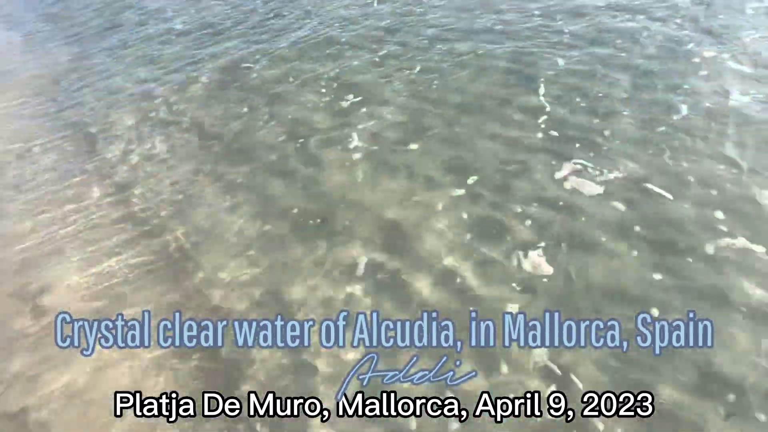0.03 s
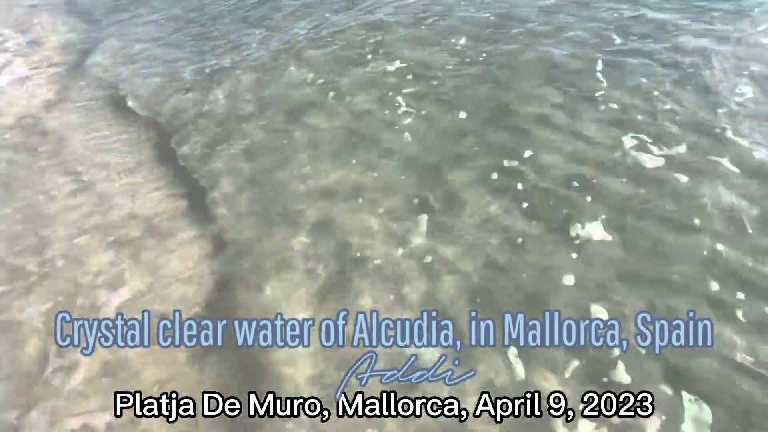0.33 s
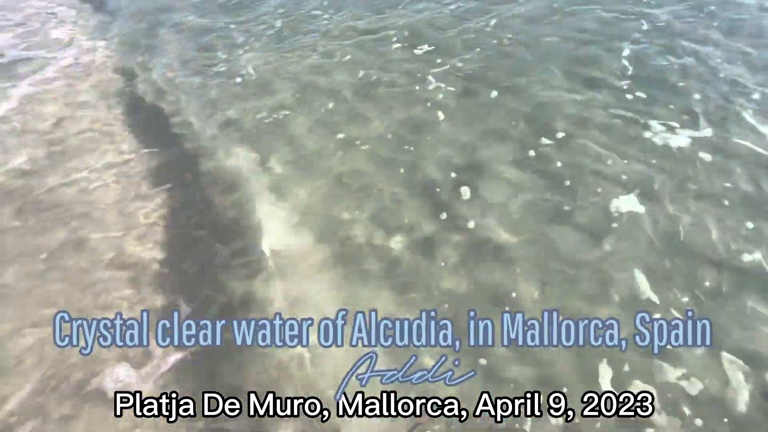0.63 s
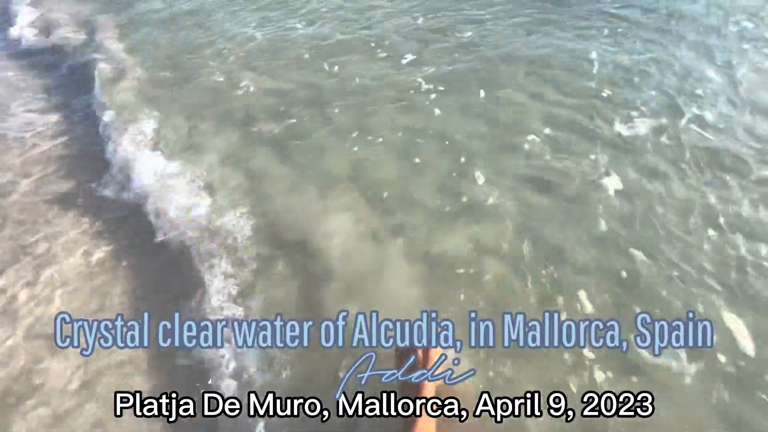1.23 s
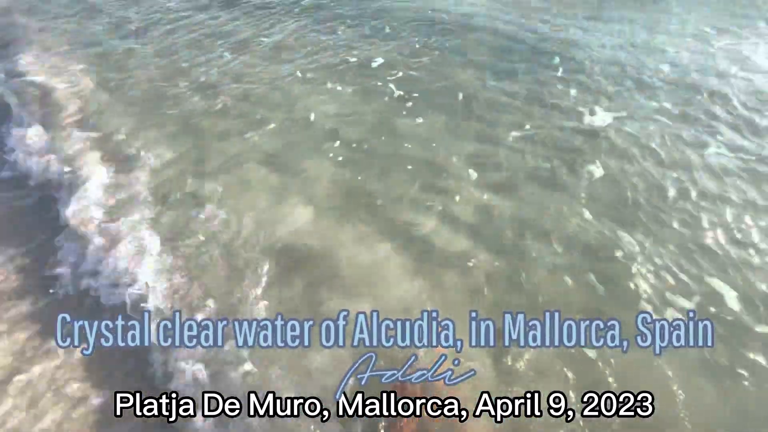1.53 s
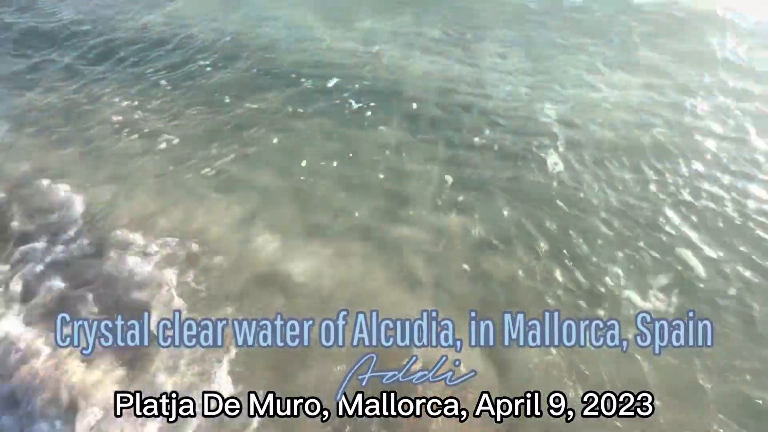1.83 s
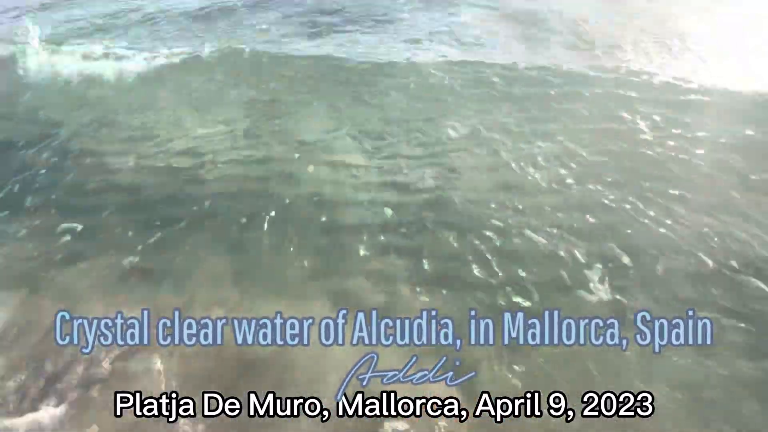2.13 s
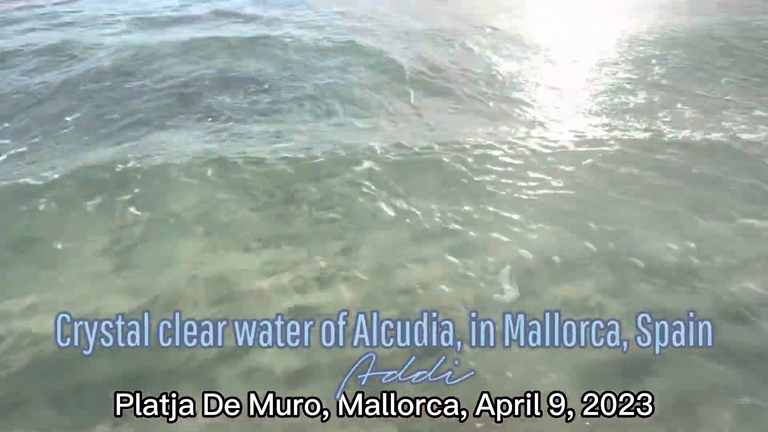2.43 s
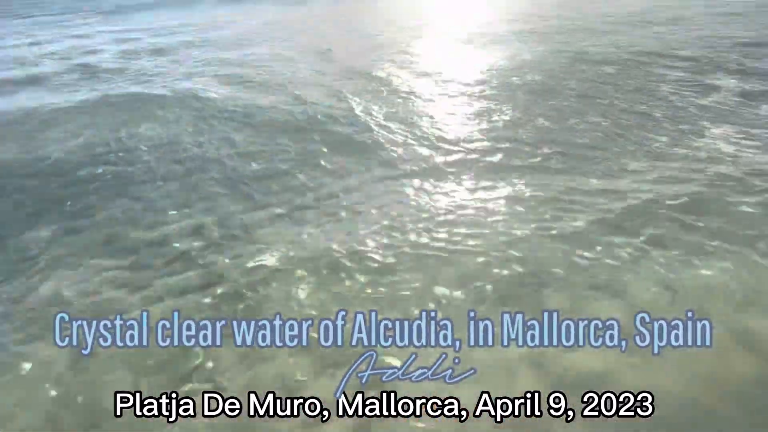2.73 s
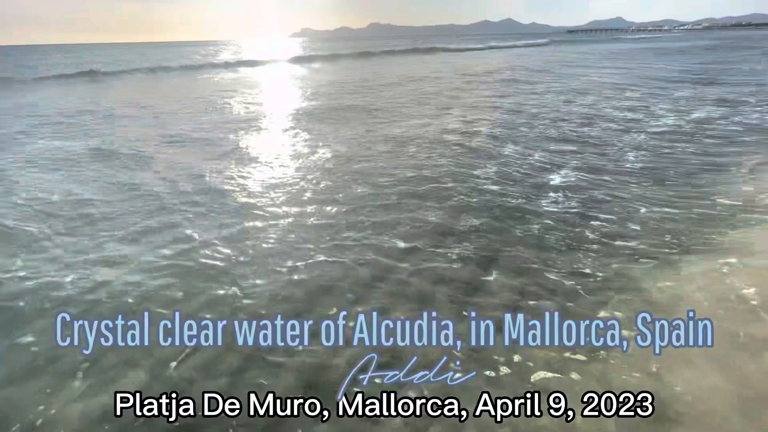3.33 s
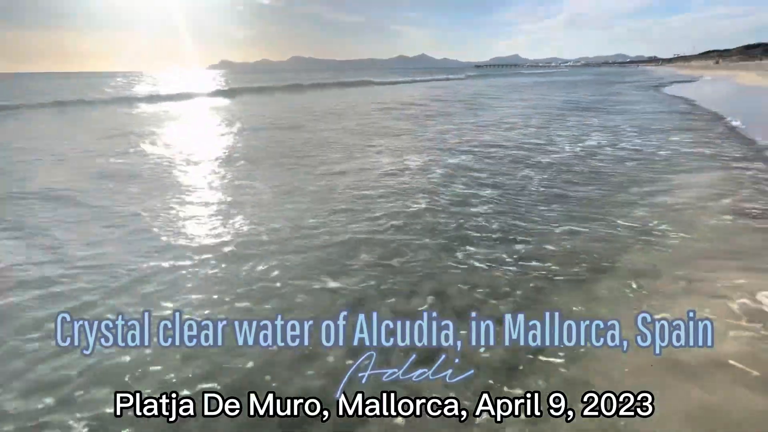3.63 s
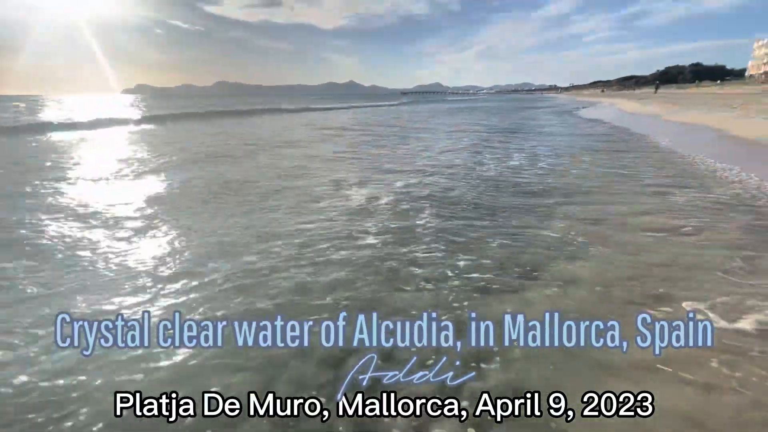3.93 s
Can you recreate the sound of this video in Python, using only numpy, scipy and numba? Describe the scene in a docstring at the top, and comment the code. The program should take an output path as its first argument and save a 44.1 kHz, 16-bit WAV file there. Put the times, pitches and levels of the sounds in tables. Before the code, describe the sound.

A small wave breaks on a sandy shore, close to the microphone on the left, sloshing and gurgling as its foam fizzes away. Ripples then slap on the right, over faint distant surf and light wind rumble.

```python
"""A small wave curls over on a sandy shore, close to a hand-held microphone and to its left.
It sloshes, trapped air pockets gurgle, and spray and fizzing foam die away as it runs up the sand.
Then ripples slap on the right. The water is mostly ringing bubbles: large ones low, small ones high.
Foam hisses farther along the shore; a light wind rumbles on the microphone and grows near the end."""
import sys
import numpy as np
from scipy import signal
from scipy.fft import rfft, irfft
from scipy.io import wavfile
from scipy.ndimage import uniform_filter1d
from numba import njit

SR = 44100
rng = np.random.default_rng(int(sys.argv[2]) if len(sys.argv) > 2 else 0)


def inscribe(sig):
    """Save sig as 16-bit PCM at rate SR to the path in sys.argv[1].

    A 1-D sig is mono; a 2-D sig holds one channel per row.
    Samples are clipped to [-1, 1] before scaling.
    """
    pcm = np.round(np.clip(np.atleast_2d(sig).T, -1, 1) * 32767)
    wavfile.write(sys.argv[1], SR, pcm.astype(np.int16))


N = 176400

# how spray and foam swell and fade (time [s], spray level [dB], foam level [dB])
WHITEWATER_LEVELS = [(0, -38, -48), (.4, -35.5, -42.5), (.7, -38, -47), (.8, -38.5, -40.5),
                     (.97, -28.5, -38), (1.2, -33, -35.5), (1.5, -35, -40.5), (2.05, -34, -40),
                     (2.3, -40.5, -43.5), (2.7, -52.5, -48), (2.95, -45.5, -52), (3.28, -49, -53.5),
                     (3.45, -43.5, -45.5), (4, -45.5, -46)]
# spectrum of the foam, the part common to both channels (frequency [Hz], gain [dB])
FOAM_MID_SPECTRUM = [(1470, -21), (2500, 3), (2790, -1.5), (3910, -1.5), (4340, -3), (4720, -5), (5270, -5),
                     (5450, -5), (5840, -0.5), (6170, -1.5), (8020, -9), (8960, -3.5), (9270, -4.5),
                     (9600, -11), (10100, -67), (10900, -13), (11500, -13), (12400, -21), (13000, -33)]
# spectrum of the foam, the part that gives stereo width (frequency [Hz], gain [dB])
FOAM_SIDE_SPECTRUM = [(1470, -26), (2500, 3.5), (3100, 0), (3960, -7), (5350, -1), (6100, -13), (7190, -5),
                      (8150, -27), (8760, -21), (9410, 1.5), (9920, -3.5), (10900, -19), (11500, -11),
                      (12000, -24), (15600, -58), (22000, -120)]
WAVE_LEAD_MS, RIPPLE_LEAD_MS = 0.43, -0.67  # how much sooner the left microphone port hears them
GLIDE = 0.072  # share by which a bubble's pitch rises per decay time


def undb(db):
    """Decibels to gain."""
    return 10 ** (np.asarray(db) / 20)


def balance(left_db, right_db):
    """A gain for each channel."""
    return undb([[left_db], [right_db]])


def curve(table, column=1):
    """Gain over time from a column of dB."""
    rows = np.array(table)
    return undb(np.interp(np.arange(N) / SR, rows[:, 0], rows[:, column]))


def swell(peak_s, rise_s, fall_s):
    """A smooth rise and fall around a moment."""
    t = np.arange(N) / SR
    return np.exp(-.5 * ((t - peak_s) / np.where(t < peak_s, rise_s, fall_s)) ** 2)


def unit(x):
    """Scale to rms 1."""
    return x / np.sqrt(np.mean(x ** 2))


def colour(x, points):
    """Filter by (Hz, dB) points, falling 46 dB an octave beyond the ends."""
    hz, db = np.array(points, float).T
    octave, known = np.log2(np.arange(N // 2 + 1) * SR / N + 1e-3), np.log2(np.sort(hz))
    outside = np.abs(octave - np.clip(octave, known[0], known[-1]))
    return irfft(rfft(x) * undb(np.interp(octave, known, db) - 46 * outside), N)


def flicker(rate_hz):
    """Random steps, smoothed twice, at rms 1."""
    hold = int(SR / rate_hz)
    steps = rng.standard_normal(4096)[np.arange(N) // hold]
    return unit(uniform_filter1d(uniform_filter1d(steps, hold), hold))


def ports(x, lead_ms, mono_hz):
    """Two microphone ports: the left leads by lead_ms; below mono_hz they merge into one."""
    hz = np.arange(N // 2 + 1) * SR / N
    apart = 1 / (1 + (mono_hz / (hz + 1)) ** 8)
    turn = np.exp(1j * np.pi * hz * apart * lead_ms / 1000)
    left, right = rfft(np.broadcast_to(x, (2, N))) * np.array([turn, turn.conj()])
    mid, side = (left + right) / 2, (left - right) / 2 * apart
    return irfft(np.array([mid + side, mid - side]), N)


@njit
def ring(start_s, hz, cycles, size, glide):
    """Bubbles: sines that swell within a cycle, fade by 1 / e in so many cycles and rise in pitch."""
    out = np.zeros(N)
    for k in range(len(start_s)):
        life = cycles[k] / hz[k] * SR
        first, phase = int(start_s[k] * SR), 0.
        for i in range(min(int(6 * life), N - first)):
            phase += 2 * np.pi * min(hz[k] * (1 + glide * i / life) / SR, .45)
            out[first + i] += size[k] * np.exp(-i / life) * (1 - np.exp(-phase / 2)) * np.sin(phase)
    return out


def cloud(lo_hz, hi_hz, cycles, spread_db, count):
    """Bubbles at random times and pitches; a wide spread makes a few stand out."""
    when, pitch, life, strength, sign = rng.random((count, 5)).T
    hz = lo_hz + (hi_hz - lo_hz) * pitch
    boost_db = -spread_db * np.log(np.maximum(strength, .01))
    size = np.sqrt(hz) * undb(boost_db) * np.sign(sign - .5)
    return unit(ring(when * N / SR, hz, cycles * (.5 + life), size, GLIDE))


def wide_cloud(lo_hz, hi_hz, cycles, spread_db, count, width):
    """A bubble cloud that both ports hear, plus one for each port alone."""
    common, left, right = (cloud(lo_hz, hi_hz, cycles, spread_db, count) for _ in range(3))
    return common + width * np.array([left, right])


def burst(time, db, hz, cycles, scatter_s, octaves, rest_db, count):
    """One main bubble and a cluster of others just after it, together peaking at db."""
    late, pitch, size = rng.random((count, 3)).T
    main = np.arange(count) == 0
    starts = np.where(main, time, time + scatter_s * late)
    pitches = hz * 2 ** np.where(main, 0, octaves * (2 * pitch - .9))
    sizes = np.where(main, 1, undb(rest_db) * (2 * size - 1))
    sound = ring(starts, pitches, np.full(count, float(cycles)), sizes, GLIDE)
    return sound * undb(db) / np.abs(sound).max()


def churn():
    """Large, heavily damped bubbles in the tumbling water close by."""
    # surges of the water (time [s], level [dB])
    levels = [(0.0, -26), (0.08, -44), (0.18, -30), (0.25, -18.5), (0.31, -39.5), (0.45, -29),
              (0.61, -29.5), (0.69, -46.5), (0.81, -33.5), (0.88, -37), (1.19, -24.5), (1.31, -20.5),
              (1.37, -25), (1.47, -20), (1.51, -23.5), (1.62, -25.5), (1.68, -20), (1.93, -30), (2.07, -21),
              (2.16, -29), (2.82, -32.5), (2.87, -40), (2.99, -34), (3.04, -24.5), (3.15, -31),
              (3.2, -24.5), (3.26, -36.5), (3.38, -27.5), (3.9, -31.5), (3.95, -24.5), (4.0, -39)]
    # its low rumble (frequency [Hz], gain [dB])
    spectrum = [(70, 1.5), (125, 0), (180, 0.5), (300, -2.5), (420, -7), (600, -38), (1000, -71)]
    bubbles = cloud(87.6, 565.0, cycles=0.54, spread_db=3.5, count=2200)
    return unit(colour(bubbles, spectrum)) * curve(levels) * undb(1.0)


def wind():
    """Wind buffets the microphone, the same in both channels."""
    # gusts (time [s], level [dB])
    gusts = [(0.0, -37), (0.17, -44), (0.26, -26), (0.44, -45), (0.65, -33.5), (0.72, -50), (1.48, -31),
             (1.59, -38), (1.67, -20.5), (1.69, -28.5), (2.35, -30.5), (2.36, -34), (3.01, -31.5),
             (3.03, -23), (3.15, -30), (3.27, -23.5), (3.7, -21), (3.79, -27), (3.97, -25.5), (4.0, -27)]
    # deep rumble of the buffeting (frequency [Hz], gain [dB])
    spectrum = [(13, -44), (22, -43), (43, -7.5), (65, -3.5), (93, -10), (141, -15), (170, -50), (220, -32),
                (370, -120)]
    return unit(colour(rng.standard_normal(N), spectrum)) * curve(gusts) * undb(3.0)


def far_surf():
    """Foam farther along the shore blends into a steady hiss."""
    # tilt against the near foam (frequency [Hz], gain [dB])
    tilt = [(2000, -12.5), (5000, -11), (8500, -6), (13000, -7.5)]
    mid, side = (unit(colour(colour(rng.standard_normal(N), spectrum), tilt))
                 for spectrum in (FOAM_MID_SPECTRUM, FOAM_SIDE_SPECTRUM))
    return np.array([mid + side, mid - side]) * undb(-50)


def spray():
    """Small bubbles and drops thrown up along the breaking front."""
    drops = wide_cloud(802.0, 3860.0, cycles=3.35, spread_db=2.0, count=4500, width=0.98)
    # tone of the spray (frequency [Hz], gain [dB])
    spectrum = [(700, -1), (1300, 0), (2200, -2.5), (2800, -11), (4000, -16)]
    at_mic = unit(ports(colour(drops, spectrum), WAVE_LEAD_MS, mono_hz=906))
    spurts = undb(-0.5 + 1.84 * flicker(50))
    return at_mic * balance(-2.2, 1.4) * curve(WHITEWATER_LEVELS) * spurts


def foam():
    """Tiny bubbles burst over a smooth hiss, in flurries that deepen as the foam gets louder."""
    mid, side = (cloud(2598.0, 13030.0, cycles=7.1, spread_db=2.7, count=14000)
                 + 1.2 * rng.standard_normal(N) for _ in range(2))
    mid = unit(colour(mid, FOAM_MID_SPECTRUM))
    side = unit(colour(side, FOAM_SIDE_SPECTRUM)) * undb(0.5)
    level = curve(WHITEWATER_LEVELS, column=2)
    flurries = undb((1.3 * flicker(40) + 0.8 * flicker(16)) * np.sqrt(level / level.max()))
    return np.array([mid + side, mid - side]) * level * flurries * balance(0, -0.5)


def sloshes():
    """Swells of bubbles where the water spills over itself."""
    # spills (peak time [s], rise [s], fall [s], level [dB], centre pitch [Hz], left port's lead [ms])
    spills = [(.19, 0.039, 0.064, -26, 1330, 0.32), (.247, 0.12, 0.04, -23, 325, 0.98),
              (.24, 0.089, 0.036, -26, 856, 0.36), (0.341, 0.0083, 0.0061, -22.5, 297, 0.51),
              (0.561, 0.023, 0.01, -29, 355, 0.28), (.785, 0.03, 0.019, -27.5, 1080, 1),
              (1.665, 0.0051, 0.014, -30.5, 553, 0.58), (2.05, 0.39, 0.15, -24.5, 125, -0.083),
              (2.39, 0.0093, 0.014, -33, 860, 0.2), (3.06, 0.043, 0.14, -38, 610, -0.63),
              (3.49, 0.16, 0.18, -35.5, 980, -0.94), (3.685, 0.02, 0.02, -27.5, 335, -1.2),
              (3.95, 0.081, 0.1, -31.5, 428, -0.69)]
    out = 0
    for peak, rise, fall, db, hz, lead_ms in spills:
        mid, side = (cloud(hz * 0.5, hz * 1.517, cycles=1.02, spread_db=-0.05, count=1800)
                     for _ in range(2))
        bubbles = unit(mid + 0.46 * np.array([side, -side]))
        out += ports(bubbles * swell(peak, rise, fall) * undb(db), lead_ms, mono_hz=427)
    return out


def gulps():
    """Large bubbles pinch off and ring on their own for a few cycles."""
    # single bubbles (time [s], level [dB], pitch [Hz], decay [cycles])
    bubbles = [(0.236, -19, 340, 4.7), (0.248, -23, 1042, 15), (0.385, -16, 266, 1.4),
               (0.558, -19, 400, 2.5), (1.016, -14, 496, 4.4), (1.1, -17, 285, 2.5),
               (1.131, -15.5, 600, 2.7), (1.312, -9, 176, 2.7), (1.4, -15, 163, 4), (1.429, -12.5, 362, 4),
               (1.48, -3, 150, 1.06), (1.581, -10.5, 200, 4.3), (1.613, -8, 180, 3.6), (1.663, -18, 288, 3),
               (1.744, -10, 145, 2.1), (2.11, -15.5, 115, 3.3)]
    start, db, hz, cycles = np.array(bubbles, float).T.copy()
    return ports(ring(start, hz, cycles, undb(db), GLIDE / 2), WAVE_LEAD_MS, mono_hz=1300)


def crest():
    """Middle-sized bubbles crowd together as the crest folds over, close on the left."""
    # course of the breaking crest (time [s], level [dB])
    levels = [(0, -60), (.45, -37.5), (.55, -37.5), (.69, -41), (.85, -37.5), (1, -29), (1.2, -26.5),
              (1.42, -25.5), (1.7, -25.5), (1.85, -29), (2.03, -26), (2.18, -32.5), (2.4, -33.5),
              (2.65, -35), (2.9, -41), (2.99, -36), (3.06, -28.5), (3.16, -32), (3.28, -39.5), (3.55, -41),
              (3.75, -41), (4, -35)]
    # tone of its gurgle (frequency [Hz], gain [dB])
    spectrum = [(250, -29), (450, 3.5), (680, 0.5), (900, -0.5), (1200, -4.5), (1700, -13), (3000, -15)]
    bubbles = wide_cloud(299.0, 1926.0, cycles=0.69, spread_db=2.5, count=6000, width=0.98)
    at_mic = unit(ports(colour(bubbles, spectrum), WAVE_LEAD_MS, mono_hz=740))
    spurts = undb(-0.5 + 2 * flicker(110))
    return at_mic * curve(levels) * spurts


def crackle():
    """The thin lip of the wave shatters into crackling drops on the left."""
    # bright tone of the drops (frequency [Hz], gain [dB])
    spectrum = [(2800, -16), (3500, 0), (4300, 5), (5200, 0), (6200, 7.5), (7500, -10)]
    drops = wide_cloud(3100.0, 6950.0, cycles=6.0, spread_db=3.8, count=4000, width=0.75)
    at_mic = unit(ports(colour(drops, spectrum), WAVE_LEAD_MS, mono_hz=600))
    envelope = swell(peak_s=0.92, rise_s=0.12, fall_s=0.61) * undb(-40.5)
    return at_mic * envelope * balance(1.5, -1.5)


def plops():
    """Pockets of air trapped by the wave collapse with a short gulp and a brighter spit."""
    # air pockets (time [s], gulp level [dB], gulp pitch [Hz], spit level [dB])
    pockets = [(0.765, -23.5, 720, -33), (0.79, -16, 920, -18), (1.237, -16, 754, -19),
               (1.258, -27, 940, -18), (1.273, -12, 560, -35), (1.319, -11.5, 555, -29),
               (1.350, -11.5, 475, -28), (1.374, -10, 526, -21), (1.443, -14, 660, -21),
               (1.483, -0.5, 530, -13), (1.547, -13, 690, -18), (1.656, -7, 530, -15),
               (1.671, -13, 670, -29), (1.715, -13, 750, -27), (1.926, -14.5, 573, -37),
               (1.955, -6, 534, -15.5), (1.995, -14, 655, -20), (2.004, -13.5, 861, -15),
               (2.03, -13, 560, -32), (2.068, -12, 795, -11.5), (2.076, -7.5, 603, -17),
               (2.113, -12.5, 696, -17), (2.232, -12.5, 790, -16), (2.239, -26, 590, -18),
               (2.273, -16.5, 650, -30), (2.316, -15, 670, -28), (2.342, -22, 750, -25),
               (2.386, -16, 646, -21), (2.398, -13, 750, -35), (2.433, -18, 450, -35),
               (2.49, -25, 920, -29), (2.506, -19.5, 646, -22.5), (2.559, -14, 556, -16),
               (2.598, -17, 685, -27), (2.614, -17, 600, -27), (2.669, -20, 480, -42),
               (2.743, -20, 655, -32), (2.775, -19.5, 573, -25), (2.828, -18.5, 544, -20),
               (2.927, -20.5, 515, -30)]
    gulp = sum(burst(t, db, hz, cycles=0.67, scatter_s=0.0059, octaves=0.99, rest_db=-3.5, count=8)
               for t, db, hz, _ in pockets)
    spit = sum(burst(t, db, hz=1150, cycles=0.83, scatter_s=0.007, octaves=0.41, rest_db=0, count=10)
               for t, _, _, db in pockets)
    return ports(gulp, WAVE_LEAD_MS, mono_hz=830) + ports(spit, lead_ms=0.22, mono_hz=1170) * undb(-1.5)


def droplets():
    """Single drops tick on the surface, a little to the left."""
    # falling drops (time [s], level [dB], pitch [Hz])
    drops = [(0.783, -33, 4780), (0.956, -23.5, 5600), (1.096, -22, 4070), (1.219, -18.5, 7100),
             (1.336, -31, 8400), (1.499, -20, 6230), (2.077, -29, 8650), (2.084, -25.5, 3960)]
    ticks = sum(burst(t, db, hz, cycles=7, scatter_s=0.003, octaves=0.25, rest_db=-4, count=6)
                for t, db, hz in drops)
    return ticks * balance(0, -2)


def trickle():
    """Bubbles of many pitches ring as the water drains back over the sand."""
    bubbles = cloud(450.0, 1750.0, cycles=2.2, spread_db=3.0, count=2000)
    envelope = swell(peak_s=2.37, rise_s=0.17, fall_s=0.38) * undb(-38)
    return ports(bubbles * envelope, lead_ms=0.25, mono_hz=800)


def slaps():
    """Ripples clap shut with an edge, a snap, a gulp and a splatter, reaching the right port first."""
    # ripples (time [s], level [dB], pitch [Hz], snap length [s])
    ripples = [(3.013, -14.5, 1030, 0.007), (3.05, -18, 930, 0.017), (3.107, -19, 1010, 0.0028),
               (3.113, -17, 1060, 0.01), (3.162, -23, 940, 0.0038), (3.172, -24, 1030, 0.0051),
               (3.198, -22.5, 1260, 0.003), (3.342, -15.5, 970, 0.0092), (3.458, -15, 970, 0.01),
               (3.488, -22, 786, 0.0086), (3.534, -13, 1200, 0.00174), (3.555, -21, 1150, 0.0039),
               (3.612, -18, 1160, 0.0034), (3.813, -21, 450, 0.015), (3.939, -18.5, 675, 0.0045)]
    edge = sum(burst(t, db, hz=1750, cycles=1.6, scatter_s=0.006, octaves=0.3, rest_db=0, count=8)
               for t, db, _, _ in ripples)
    snap = sum(burst(t, db, hz, cycles=0.9, scatter_s=length, octaves=0.6, rest_db=0, count=16)
               for t, db, hz, length in ripples)
    gulp = sum(burst(t, db, hz=445, cycles=2.3, scatter_s=0.012, octaves=0.67, rest_db=-2.5, count=6)
               for t, db, _, _ in ripples)
    splatter = sum(burst(t, db, hz, cycles=1.5, scatter_s=0.03, octaves=0.8, rest_db=5, count=36)
                   for t, db, hz, _ in ripples)
    bright = undb(-7.5) * edge * balance(2.5, -2.5)
    body = (undb(1.5) * snap + undb(-6) * gulp + undb(-11.5) * splatter) * balance(1.2, -0.8)
    return ports(bright + body, RIPPLE_LEAD_MS, mono_hz=395)


def scene():
    """The close wave and the ripples after it, with far surf and wind on the microphone."""
    wave = churn() + crest() + spray() + crackle() + foam() + plops() + gulps() + sloshes() + droplets()
    return wave + trickle() + slaps() + far_surf() + wind()


def record(dry):
    """The recorder rounds the loudest peaks towards full scale and cuts the top treble."""
    top_hz = 15700
    rounded = dry / (1 + dry ** 4) ** (1 / 4)
    return signal.sosfilt(signal.ellip(8, .2, 70, top_hz, fs=SR, output="sos"), rounded)


dry = scene()
out = record(dry)
inscribe(out)
```